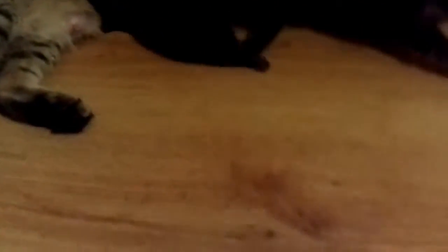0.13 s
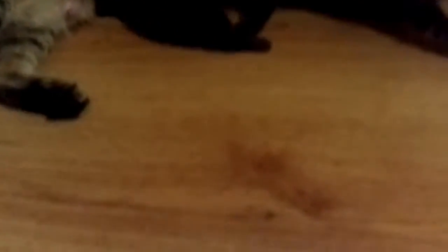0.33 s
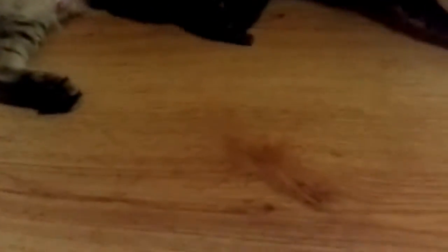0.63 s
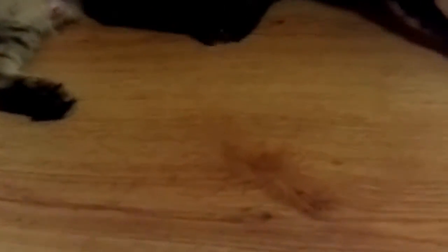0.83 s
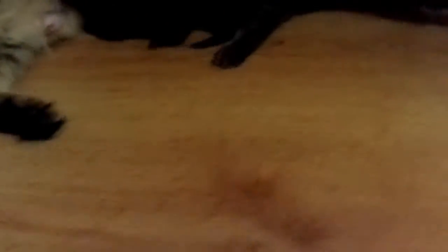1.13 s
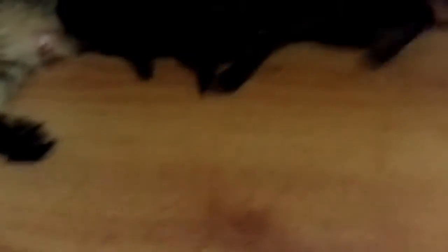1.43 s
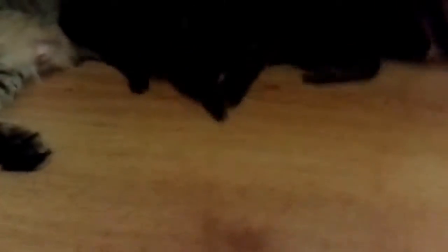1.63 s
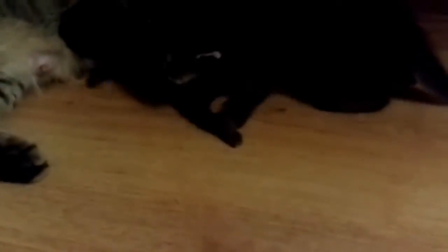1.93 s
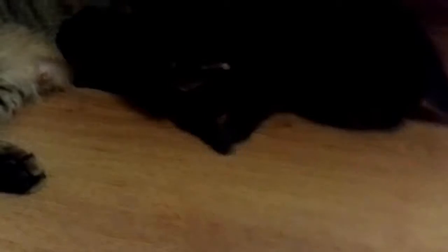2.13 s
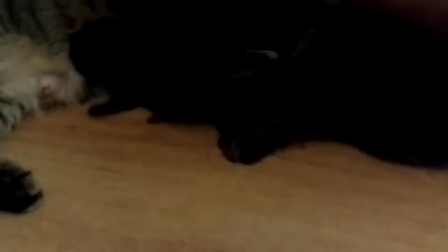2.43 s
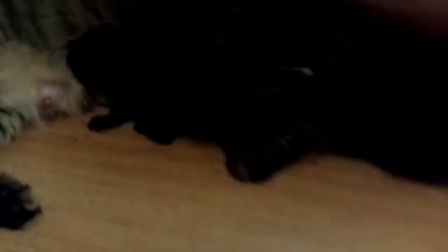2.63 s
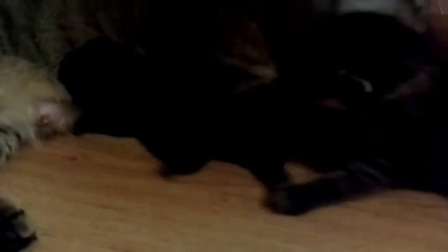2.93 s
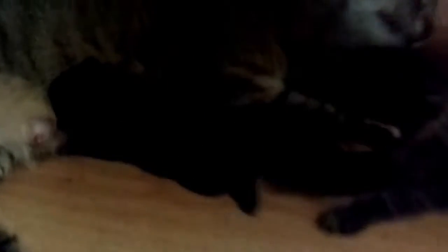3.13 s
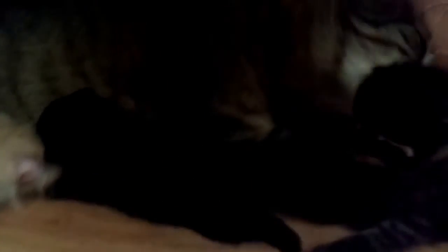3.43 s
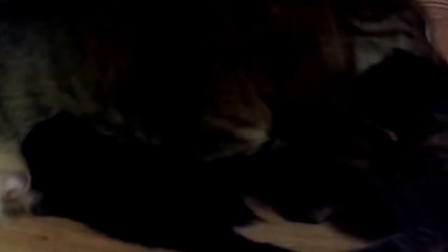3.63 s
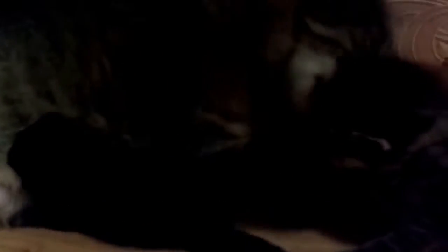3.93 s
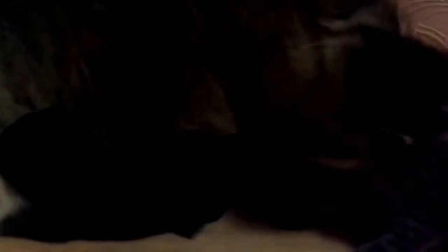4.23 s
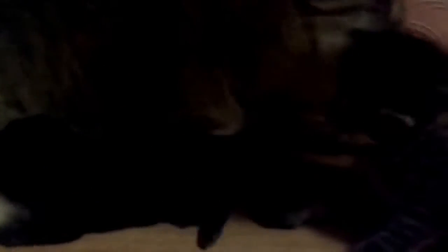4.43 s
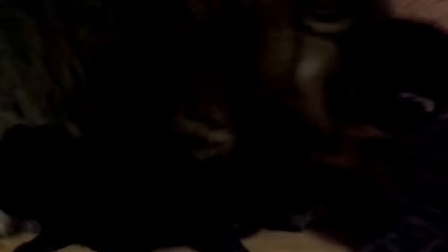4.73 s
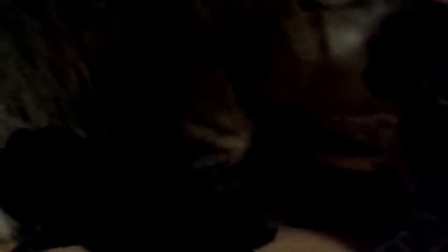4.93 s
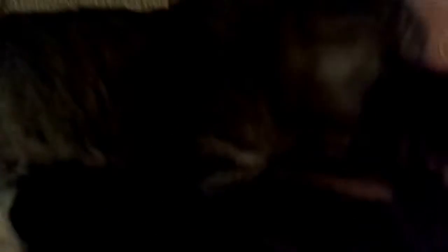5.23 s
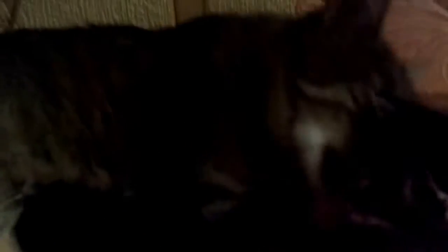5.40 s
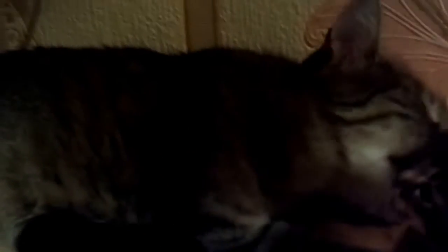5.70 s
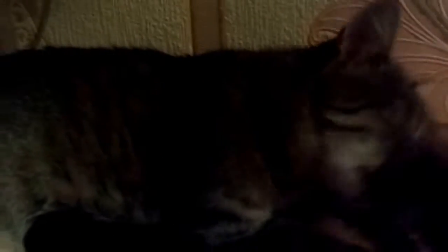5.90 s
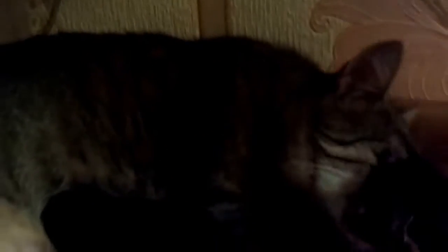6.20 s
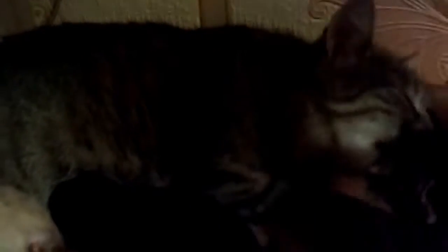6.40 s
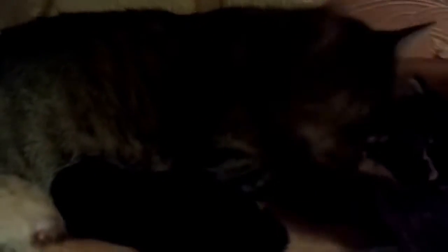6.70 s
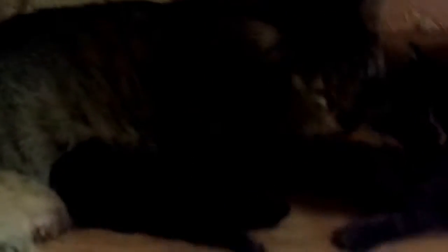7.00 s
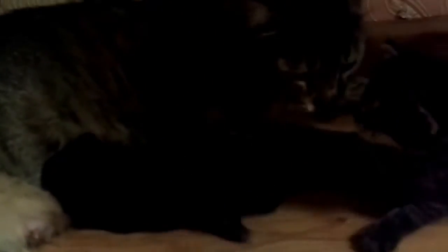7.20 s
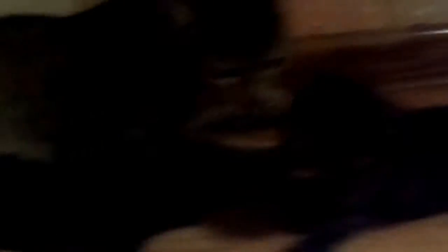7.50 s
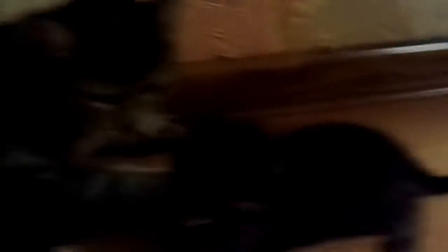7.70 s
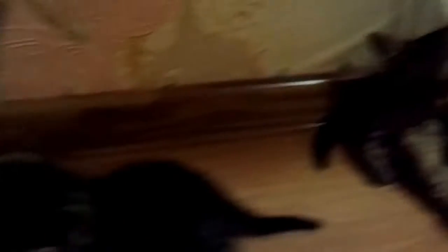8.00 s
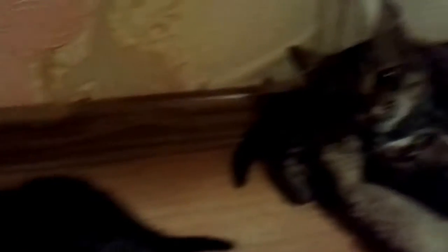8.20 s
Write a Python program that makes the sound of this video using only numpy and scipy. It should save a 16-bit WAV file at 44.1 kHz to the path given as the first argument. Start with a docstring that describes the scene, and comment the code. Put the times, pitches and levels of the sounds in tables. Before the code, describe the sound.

Light dry claw clicks, paw patter and soft fur rustle from wrestling kittens on wood, over constant hiss and barely audible bursts of purring.

```python
"""Kittens wrestling on a wooden floor

Claw ticks, hollow taps and dull paw thuds are struck resonances; paws scrabble in a fine crackle and fur
slides with a hiss, both made of random micro-slips. Ticks, scrabbling and fur ring a small camera's narrow
microphone port. The mother purrs in bursts of even beats. Under it lie electronic hiss, a wavering hum
and a thin whine, made of shaped noise."""
import sys
import numpy as np
from scipy import signal
from scipy.fft import rfft, irfft
from scipy.io import wavfile
from scipy.ndimage import uniform_filter1d

SR = 44100
rng = np.random.default_rng(int(sys.argv[2]) if len(sys.argv) > 2 else 0)


def store_wav(level_fs):
    """Save 16-bit WAV to argv[1]."""
    pcm = np.round(np.clip(np.atleast_2d(level_fs), -1, 1) * 32767)
    wavfile.write(sys.argv[1], SR, pcm.T.astype(np.int16))


N = 368235

# resonances of the floor boards and the microphone port: (centre [Hz], width [Hz])
BOARD, PORT = (2934, 290), (4510, 605)


def undb(db):
    """Amplitude ratio of a level in dB."""
    return 10 ** (np.asarray(db) / 20)


def level(x, rms_db):
    """Scale x to an RMS level."""
    return x * undb(rms_db) / np.sqrt(np.mean(x ** 2))


def ring(x, hz, width_hz):
    """Two-pole resonance, gain 1 at the centre."""
    b, a = signal.iirpeak(hz, hz / width_hz, fs=SR)
    return signal.lfilter(b, a, x)


def steep(x, hz, width_hz):
    """Three equal resonances in series: soft onset, dark skirts, about width_hz wide overall."""
    for _ in range(3):
        x = ring(x, hz, 2 * width_hz)
    return x


def add(out, start_s, sound):
    """Mix a sound into out at start_s."""
    i = int(start_s * SR)
    out[i:i + len(sound)] += sound


def walk(rate_hz):
    """Smooth random wander: Gaussian levels held for 1 / rate_hz, slewed twice."""
    hold = int(SR / rate_hz)
    steps = np.repeat(rng.standard_normal(N // hold + 1), hold)
    slewed = uniform_filter1d(uniform_filter1d(steps, hold), hold)
    return 1.3 * slewed[:N]


def grit(slips_per_s, spread_db, smooth):
    """Friction: scattered micro-slips of uneven size (RMS 1) over a smooth noise rub (RMS smooth)."""
    size = undb(spread_db * np.minimum(rng.exponential(size=N), np.pi))
    slips = (rng.random(N) < slips_per_s / SR) * size * rng.choice([-1, 1], N)
    return level(slips, 0) + smooth * rng.standard_normal(N)


def bouts(start_s, length_s, bout_db, bed_db):
    """Gain of separate bouts (rise, hold, fall) whose power adds to a bed."""
    rise_s, fall_s = 0.015, 0.02  # exponential time constants
    t = np.arange(N) / SR
    power = undb(bed_db) ** 2
    for start, length, gain in zip(start_s, length_s, undb(bout_db)):
        before = np.maximum(start - t, 0) / rise_s
        after = np.maximum(t - start - length, 0) / fall_s
        power = power + (gain * np.exp(-before - after)) ** 2
    return np.sqrt(power)


def ticks(scratch_s=0.00015, scratch_db=-9, chatter_db=-22, chatter_s=0.0032, hard_db=-34, widen=1.0):
    """Claw ticks: a sharp tap, a brief scratch and a chatter as the claw settles ring board and port."""
    # claw ticks, RMS over the first 5 ms:
    # (time [s], board ring [Hz], board level [dB], port level [dB], snap level [dB])
    claw_ticks = [(0.2514, 3710, -56, -54, -63), (0.38, 2960, -51, -55, -76), (0.429, 3110, -50, -51, -77),
                  (0.434, 2870, -48, -52, -77), (0.4796, 2920, -41.5, -50, -77),
                  (0.5261, 2820, -46.5, -58, -76), (0.573, 2840, -47, -54, -76),
                  (0.5985, 2900, -44.5, -63, -73), (0.6472, 2970, -46.5, -51, -76),
                  (0.709, 3200, -42.5, -53, -68), (0.747, 2900, -52, -64, -76),
                  (0.795, 2740, -52, -46.5, -75), (0.823, 2980, -48, -64, -77),
                  (0.8318, 3500, -49, -58, -77), (1.0893, 3870, -33.5, -34, -47.5),
                  (1.0926, 3000, -44, -37, -59), (1.17, 3110, -47.5, -55, -71),
                  (1.2372, 3220, -47, -47, -59), (1.2519, 2850, -44, -62, -76),
                  (1.2849, 2900, -40, -40.5, -63), (1.298, 2950, -44, -46, -65),
                  (1.312, 2960, -43.5, -63, -73), (1.3885, 3180, -53, -61, -70),
                  (1.535, 2960, -42, -46, -66), (1.6745, 2900, -40, -40.5, -50.5),
                  (1.7248, 2930, -42, -32, -52), (1.729, 4130, -56, -33, -47.5),
                  (1.7906, 2960, -39.5, -47, -69), (1.8043, 2900, -42, -45, -66),
                  (1.8097, 3050, -44, -62, -60), (1.8615, 3040, -40.5, -63, -75),
                  (1.9008, 2820, -50, -61, -76), (1.9966, 2930, -38.5, -49, -54),
                  (2.0202, 2810, -51, -63, -77), (2.043, 3700, -53, -55, -73),
                  (2.4127, 3740, -75, -51, -79), (2.4656, 4090, -37.5, -73, -76),
                  (2.6851, 2920, -44.5, -36, -53), (2.7094, 2820, -26, -28, -44),
                  (2.7217, 3180, -47, -61, -74), (2.7827, 3970, -58, -53, -57),
                  (2.8696, 3990, -67, -41, -62), (2.9191, 3230, -50, -60, -74),
                  (2.9908, 2970, -44, -58, -58), (2.999, 2640, -45, -35.5, -52),
                  (3.0276, 3700, -40, -36.5, -72), (3.064, 3990, -62, -51, -77),
                  (3.2309, 2920, -30.5, -22, -35), (3.2426, 4330, -32, -17, -35.5),
                  (3.245, 2950, -29, -51, -61), (3.4181, 2940, -45, -50, -71),
                  (3.6202, 2980, -45, -38, -77), (3.709, 3000, -52.5, -67, -77),
                  (4.16, 3100, -37.5, -58, -60), (4.2514, 3240, -41, -33, -65),
                  (4.5137, 3140, -56, -62, -75), (4.5348, 2840, -53, -55, -64),
                  (4.549, 2890, -53, -58, -65), (4.5718, 3060, -50, -56, -74),
                  (4.5872, 2950, -47, -47, -55), (4.6541, 3630, -41.5, -55, -67),
                  (4.6817, 3880, -44, -55, -68), (4.72, 3990, -64, -50, -76), (4.7926, 3960, -53, -57, -78),
                  (4.841, 3140, -63, -54, -53.5), (4.9667, 3160, -39, -30.5, -77),
                  (5.112, 3990, -65, -52, -54), (5.1352, 3970, -46, -42.5, -56),
                  (5.151, 3600, -56, -48, -65), (5.3595, 3550, -59, -45, -68), (5.47, 3900, -58, -54, -64),
                  (5.5644, 4080, -56, -52, -71), (5.6027, 3810, -65, -56, -55.5),
                  (5.708, 3870, -57, -55, -76), (5.8378, 3700, -54, -59, -74), (5.846, 3720, -54, -53, -61),
                  (5.887, 3980, -55, -52, -77), (6.0919, 4180, -38, -38, -72),
                  (6.0955, 2380, -38.5, -32.5, -72), (6.1005, 2520, -42, -43, -77),
                  (6.4245, 3940, -46.5, -45.5, -76), (6.4618, 4030, -68, -54, -69),
                  (6.5198, 2940, -47, -78, -78), (6.525, 2880, -49, -42.5, -78),
                  (6.5306, 2930, -44.5, -53, -80), (6.54, 3060, -45, -57, -78),
                  (6.8188, 4000, -59, -45, -76), (6.8682, 2850, -50, -52, -70),
                  (6.9291, 2640, -46.5, -57, -77), (6.9674, 2780, -45, -61, -79),
                  (6.9768, 2820, -42, -51, -68), (6.988, 3100, -41.5, -65, -77),
                  (6.9993, 2760, -49, -61, -78), (7.0733, 2970, -42.5, -52, -80),
                  (7.1253, 3020, -50, -52, -75), (7.152, 3090, -71, -53, -78),
                  (7.2993, 2900, -48, -65, -78), (7.3278, 3000, -56, -57, -77),
                  (7.364, 2780, -52, -57, -77), (7.4505, 2820, -43, -46.5, -63),
                  (7.463, 2720, -45, -50, -76), (7.5727, 2440, -36, -42, -79),
                  (7.5795, 3100, -35.5, -47, -80), (7.5981, 3990, -68, -47.5, -71),
                  (7.6272, 2930, -45, -70, -77), (7.6613, 2830, -45.5, -52.5, -77),
                  (7.761, 2910, -43.5, -57, -74), (7.7843, 2980, -39, -61, -75),
                  (7.7979, 2900, -41, -45, -74), (7.8064, 2720, -40, -46, -76),
                  (7.8352, 3840, -62, -43, -65), (7.848, 2920, -51, -46, -77),
                  (7.8687, 2940, -51, -68, -77), (7.9952, 2970, -51, -64, -77)]
    knock, snap = (1850, 700), (9000, 4400)  # (centre [Hz], width [Hz])
    knock_db = -20  # re board ring
    out, t, head = np.zeros(N + SR), np.arange(SR // 40) / SR, SR // 200
    noise = rng.standard_normal((len(claw_ticks), 2, len(t)))
    for (s, board_hz, board_db, port_db, snap_db), (scratch, chatter) in zip(claw_ticks, noise):
        # a sharp tap first, then a brief scratch that peaks after scratch_s and dies away
        push = undb(scratch_db) * scratch * t / scratch_s * np.exp(-t / scratch_s)
        push += undb(chatter_db) * chatter * np.exp(-t / chatter_s)
        push[0] += 1
        # a hard strike presses the paw down, which damps the board's ring
        board_width_hz = BOARD[1] * (1 + widen * min(undb(board_db - hard_db), 2))
        resonances = knock, (board_hz, board_width_hz), PORT, snap
        levels_db = board_db + knock_db, board_db, port_db, snap_db
        for (hz, width_hz), db in zip(resonances, levels_db):
            part = steep(push, hz, width_hz)
            head_rms = np.sqrt(np.mean(part[:head] ** 2))
            add(out, s, part * undb(db) / head_rms)
    return out[:N]


def pings(rise_s=0.00084):
    """Taps on something hollow: two lightly damped modes flutter as the claw stays in touch."""
    # taps, levels before flutter, rise and decay:
    # (time [s], upper mode amplitude [dB], lower mode amplitude [dB], t60 [s])
    taps = [(3.0276, -27, -60, 0.028), (3.377, -40.5, -69, 0.058), (4.654, -30.5, -35.5, 0.028),
            (4.682, -38.5, -51, 0.094), (6.1005, -60, -46, .08)]
    upper_hz, lower_hz = 3910, 2350
    out, t = np.zeros(N + SR), np.arange(SR // 10) / SR
    flutter = 1 + 3.4 * uniform_filter1d(rng.standard_normal((len(taps), len(t))), size=50)
    for (s, upper_db, lower_db, t60_s), shake in zip(taps, flutter):
        upper = undb(upper_db) * np.sin(2 * np.pi * upper_hz * t)
        lower = undb(lower_db) * np.sin(2 * np.pi * lower_hz * t)
        envelope = (1 - np.exp(-t / rise_s)) * undb(-60 * t / t60_s)
        add(out, s, (upper + lower) * shake * envelope)
    return out[:N]


def thuds(push_s=0.003, rough=0.15):
    """Soft pads push the boards: a short dull knock."""
    # paw thuds: (time [s], peak level [dB], ring [Hz])
    paw_thuds = [(0.795, -49.5, 760), (0.795, -38, 1800), (1.088, -45.5, 800), (1.0893, -30, 2150),
                 (1.728, -40.5, 840), (1.757, -44, 900), (2.695, -43, 1400), (2.7397, -45, 1800),
                 (2.919, -41.5, 1800), (2.711, -43, 1900), (2.991, -27, 1570), (2.991, -48, 497),
                 (3.232, -30, 1920), (3.243, -29, 1630), (4.682, -41, 1800), (7.4505, -46, 1810),
                 (7.575, -37, 1820), (7.796, -43, 1820), (7.835, -39, 1800), (8.213, -56, 794),
                 (8.271, -50, 900), (8.306, -51, 700), (8.341, -51, 800)]
    widest_hz = 850
    out, t = np.zeros(N + SR), np.arange(SR // 30) / SR
    noise = rng.standard_normal((len(paw_thuds), len(t)))
    for (s, peak_db, hz), grain in zip(paw_thuds, noise):
        push = signal.unit_impulse(len(t)) + rough * grain * np.exp(-t / push_s)
        knock = steep(push, hz, min(hz, widest_hz))  # Q of 1 or more
        add(out, s, knock * undb(peak_db) / np.abs(knock).max())
    return out[:N]


def scrabble(uneven_db=2):
    """Small claw contacts and dragging pads ring the boards; the contacts ring the port more weakly."""
    # bouts of scrabbling, levels before the uneven wander:
    # (start [s], length [s], claw crackle level [dB], dragging pad level [dB])
    paw_bouts = [(0.107, 0.077, -59, -57.5), (0.286, 0.6, -56, -62), (0.934, 0.032, -58.5, -69),
                 (1.03, 0.3, -58, -57.5), (1.347, 0.28, -55, -55), (1.694, 0.2, -51.5, -56),
                 (1.985, 0.06, -55.5, -66), (2.993, 0.066, -64, -73), (3.15, 0.083, -73, -65),
                 (3.323, 0.084, -61, -52.5), (3.565, 0.024, -73, -63), (3.822, 0.03, -62, -55.5),
                 (4.263, 0.042, -67, -60.5), (4.505, 0.2, -66, -73), (5.17, 0.15, -64, -69),
                 (6.09, 0.035, -63, -65), (6.312, 0.065, -63.5, -79), (6.565, 0.037, -53.5, -52),
                 (6.862, 0.033, -58, -69), (6.941, 0.067, -54, -62), (7.034, 0.09, -53.5, -60),
                 (7.174, .07, -63.5, -68), (7.257, 0.13, -55.5, -74), (7.432, 0.056, -59, -67),
                 (7.55, .06, -68, -59), (7.778, 0.071, -58, -62), (8.348, .02, -59, -67)]
    idle_db = -75.5  # between the bouts
    start_s, length_s, claw_db, pad_db = np.transpose(paw_bouts)
    contacts = grit(170, 2.8, 0.12)
    crackle = level(steep(contacts, BOARD[0], 460) + 0.28 * steep(contacts, *PORT), 0)
    claws = crackle * bouts(start_s, length_s, claw_db, idle_db)
    drag = level(steep(grit(600, 2.5, 0.6), 3100, 600), 0)
    pads = drag * bouts(start_s, length_s, pad_db, idle_db)
    return (claws + pads) * undb(uneven_db * walk(15))


def slide():
    """Fur rubbing on wood: gritty hiss in port, treble and low bands, strokes over a quiet rustle."""
    # strokes of fur: (start [s], length [s], port level [dB], treble [dB re port], low [dB re port])
    strokes = [(0, 0.044, -55, -7, -16), (.1, 0.07, -64, -22, -7), (0.537, 0.052, -53.5, -22, -28),
               (1.085, 0.068, -55.5, -21, -7), (1.271, 0.029, -53, -20, -24),
               (1.517, 0.079, -57.5, -0.5, -9), (1.711, 0.051, -47.5, -18, -8),
               (1.983, 0.027, -63, -12, -1), (2.227, 0.085, -61, -5, -17), (2.542, 0.15, -59, -5.5, -27),
               (2.74, 0.03, -57, -3, -12), (3.108, .03, -51, -5, -13), (3.139, 0.093, -46.5, -2.5, -14.5),
               (3.178, 0.056, -47, -12, -16), (3.32, 0.12, -63, -7, -1), (4.164, 0.036, -64, 1, -17),
               (4.658, 0.077, -55.5, -14, -8), (5.118, 0.035, -67, 8.5, -19),
               (5.14, 0.22, -47.5, -12.5, -15), (5.24, 0.11, -55.5, -20, -2), (5.51, 0.041, -57, -9, -6.5),
               (6.577, 0.035, -57, -11, -6), (6.955, .05, -64, -15, 2), (7.888, 0.073, -58.5, -5, -19),
               (8.03, 0.04, -59, -16, -25)]
    # rustle of the moving bodies: (time [s], port level [dB])
    rustle = [(0, -56), (.5, -56.5), (.97, -59.5), (1.3, -53.5), (1.9, -54.5), (2.07, -62.5), (2.65, -61.5),
              (3.05, -57), (3.3, -60), (3.95, -59.5), (4.25, -56.5), (4.95, -56.5), (5.07, -63), (5.6, -65),
              (6.1, -60.5), (6.5, -68), (7.1, -63), (8.05, -61.5), (8.35, -67)]
    rustle_treble_db, rustle_low_db = -12, -10.5  # re rustle port level
    start_s, length_s, port_db, treble_db, low_db = np.transpose(strokes)
    rustle_s, rustle_db = np.transpose(rustle)
    bed_db = np.interp(np.arange(N) / SR, rustle_s, rustle_db)
    rub = grit(1200, 3, 1.1) * undb(1.5 * walk(40))
    port = level(steep(rub, 4600, 540) + 0.45 * steep(rub, 4300, 1900), 0)
    treble = level(steep(rub, 6500, 4000) + 0.27 * steep(rub, 10500, 4000), 0)
    low = level(steep(rub, 2080, 1000), 0)
    return (port * bouts(start_s, length_s, port_db, bed_db)
            + treble * bouts(start_s, length_s, port_db + treble_db, bed_db + rustle_treble_db)
            + low * bouts(start_s, length_s, port_db + low_db, bed_db + rustle_low_db))


def purr(scatter_db=2):
    """Even beats of the larynx ring the chest; each burst swells and fades."""
    # bursts, level before beat scatter: (centre beat [s], centre beat peak [dB], 1/e half length [s])
    bursts = [(1.968, -56.5, 0.13), (2.467, -62, .06), (3.154, -58.5, 0.11), (4.156, -57.5, 0.12),
              (4.525, -61, 0.043), (5.341, -55.5, 0.071), (6.019, -60.5, .06), (6.174, -59, 0.065),
              (6.897, -60, .08), (7.397, -63, 0.22), (8.269, -57.5, 0.094)]
    beats_per_s, chest_hz, chest_width_hz = 27.9, 222.5, 71
    out, lags_s = np.zeros(N + SR), np.arange(-8, 9) / beats_per_s
    thump = steep(signal.unit_impulse(SR // 25), chest_hz, chest_width_hz)
    thump = thump / thump.max()
    scatter = scatter_db * rng.standard_normal((len(bursts), len(lags_s)))
    for (s, peak_db, half_s), beat_db in zip(bursts, scatter):
        sizes = undb(peak_db + beat_db) * np.exp(-(lags_s / half_s) ** 2)
        for lag_s, size in zip(lags_s, sizes):
            add(out, s + lag_s, size * thump)
    return out[:N]


def floor():
    """Steady hiss of the electronics (shaped noise); hum and whine are narrow resonances of noise."""
    # hiss spectrum, relative: (frequency [Hz], density [dB per Hz])
    hiss_shape = [(20, -3.5), (80, -1), (150, -7), (1000, -9), (2100, -13), (3600, -12), (4550, -9.5),
                  (5500, -11.5), (6500, -15.5), (12000, -21), (14500, -20)]
    shape_hz, shape_db = np.transpose(hiss_shape)
    bins_hz = np.arange(N // 2 + 1) * SR / N + 1  # +1 keeps the log finite
    gain = undb(np.interp(np.log(bins_hz), np.log(shape_hz), shape_db))
    hiss = irfft(rfft(rng.standard_normal(N)) * gain, N)
    hum = level(ring(rng.standard_normal(N), 99, 7), -76)
    whine = level(ring(rng.standard_normal(N), 7881, 12), -81)
    return level(hiss, -60.5) + hum + whine


def scene():
    """Sum of all sources, one channel."""
    return (ticks() + pings() + thuds() + scrabble() + slide() + purr() + floor())[None]


def record(dry):
    """The camera cuts the top: steep elliptic low-pass."""
    top_hz = 13900
    low_pass = signal.ellip(10, 0.2, 60, top_hz, fs=SR, output="sos")  # ripple, stopband [dB]
    return signal.sosfilt(low_pass, dry)


dry = scene()
out = record(dry)
store_wav(out)
```